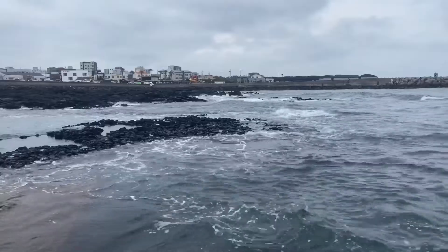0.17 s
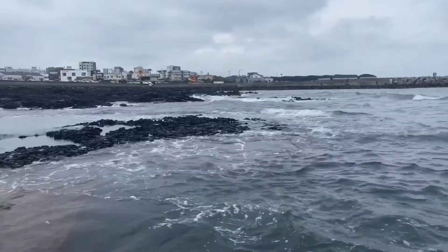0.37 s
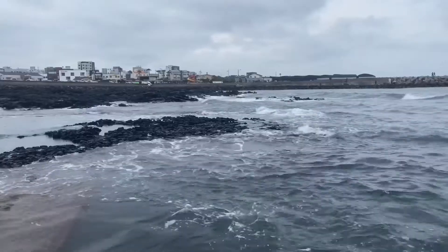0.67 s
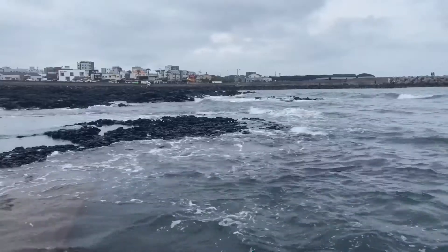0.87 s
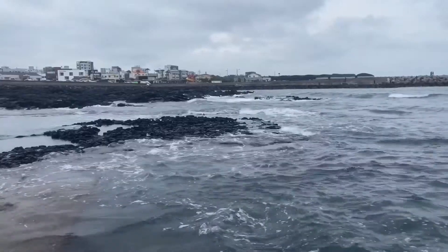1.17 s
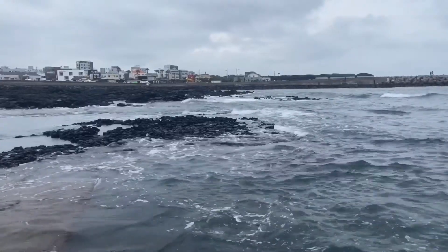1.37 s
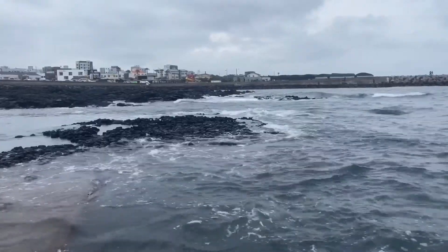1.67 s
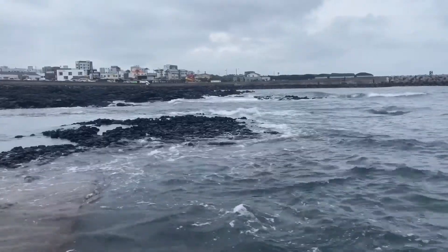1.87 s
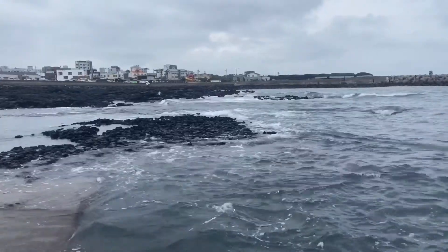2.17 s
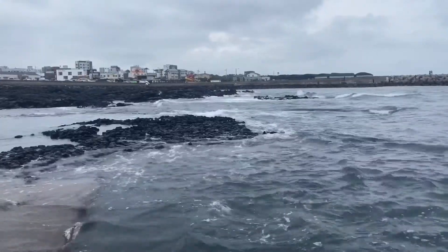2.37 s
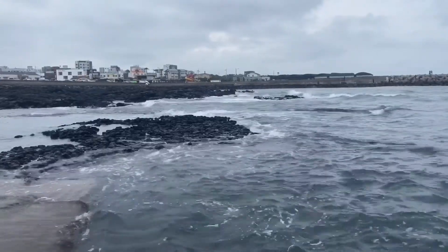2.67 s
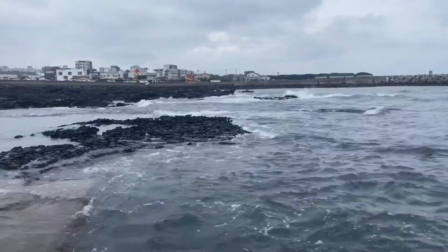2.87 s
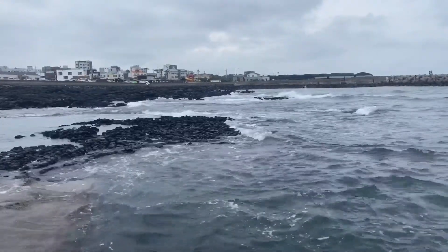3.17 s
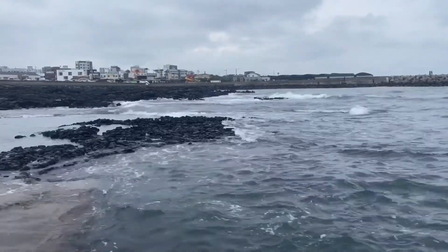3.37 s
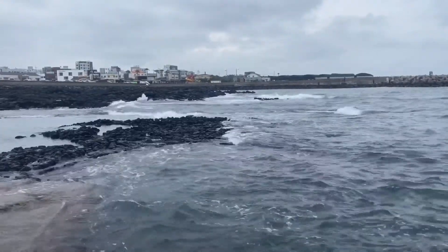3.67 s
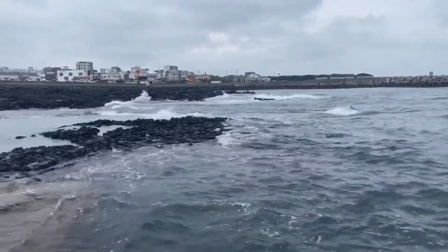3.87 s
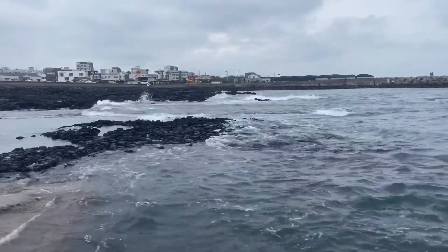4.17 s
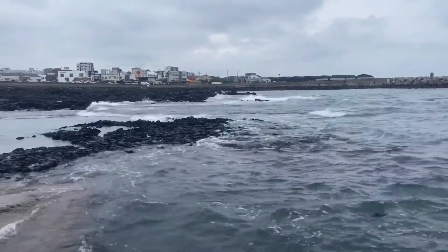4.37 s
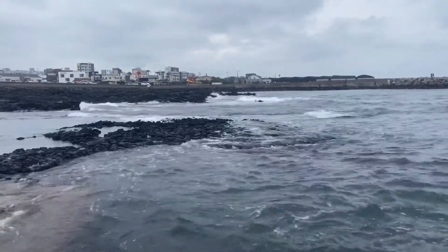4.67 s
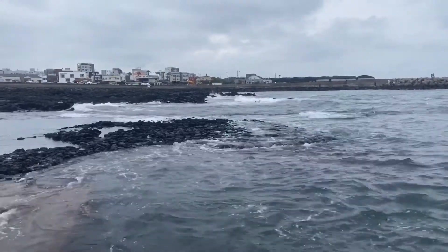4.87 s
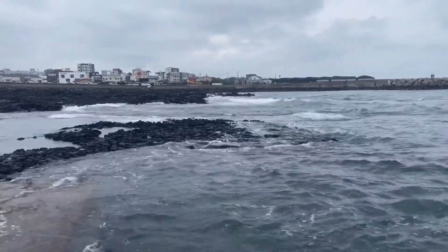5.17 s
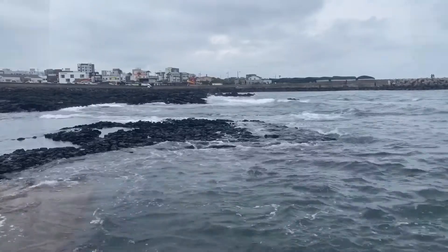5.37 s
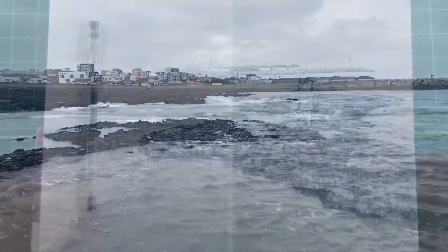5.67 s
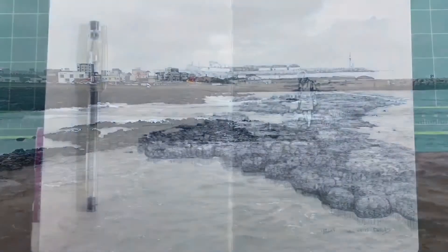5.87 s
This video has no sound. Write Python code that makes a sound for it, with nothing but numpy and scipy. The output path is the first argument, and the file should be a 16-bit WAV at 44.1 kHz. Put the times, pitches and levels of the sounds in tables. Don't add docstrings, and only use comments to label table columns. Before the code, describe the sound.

Small sea waves wash over low rocks outdoors, heard in stereo from close to the water. A continuous low roar of farther breakers lies under sloshing, lapping and fizzing foam. Gulps and drops come early, swell near one second, then thin out; more splashes follow after three seconds, and a sharp clap near five as everything fades.

```python
import sys
import numpy as np
from scipy import signal
from scipy.fft import rfft, irfft, next_fast_len
from scipy.io import wavfile
from scipy.ndimage import uniform_filter1d, map_coordinates

SR = 44100
rng = np.random.default_rng(int(sys.argv[2]) if len(sys.argv) > 2 else 0)


def linear_from_db(decibels):
    return 10 ** (np.asarray(decibels, float) / 20)


def master_out(mix):
    frames = np.transpose(np.atleast_2d(mix))
    ceiling = np.clip(frames, -1, 1)
    pcm = np.round(ceiling * 32767).astype(np.int16)
    wavfile.write(sys.argv[1], SR, pcm)


N = 264952

# frequency in Hz, level in dB.
RUMBLE_COLOUR = [(15, -40), (30, -21), (50, -2), (80, -1), (125, -2.5), (180, -14), (300, -54.5)]
# frequency in Hz, level in dB.
ROAR_COLOUR = [(60, -62), (120, -1.5), (190, 0), (350, 0.5), (560, -0.5), (800, -4.5), (1400, -37)]
# frequency in Hz, level in dB.
SLOSH_COLOUR = [(300, -43), (600, -2.5), (800, -3.5), (1000, 1.5), (1250, -5), (1550, -3.5), (1800, -13.5),
                (2300, -15), (4000, -59)]
# frequency in Hz, level in dB.
LAP_COLOUR = [(900, -15.5), (1600, 1), (2100, 3.5), (2700, -0.5), (3100, -10), (5000, -53)]
# frequency in Hz, level in dB.
FOAM_COLOUR = [(1600, -30), (2800, 2.5), (3300, 2.5), (4600, 0.5), (5600, -2.5), (7000, -7), (8500, -11),
               (12000, -35)]
# frequency in Hz, level in dB.
SPRAY_COLOUR = [(2500, -3), (4500, -15), (6000, -3.5), (8000, 3), (10000, -0.5), (12800, -2.5),
                (14300, -4.5), (16000, -8.5)]

# time in seconds, strength in dB.
BREAKERS = [(0.09, 0.5), (0.7, 0), (1.1, -2), (1.65, 1), (1.9, -1), (2.5, 2), (2.85, 1), (3.3, 3),
            (3.65, 0.5), (3.9, 3), (4.05, 0), (4.4, 3), (4.55, 0), (5.0, 1.5), (6.0, 2)]
# time in seconds, lift in dB, length in seconds, centre in
# Hz.
THUDS = [(0.14, 6.5, 0.023, 80), (0.185, 1, 0.011, 398), (0.7, 1, 0.027, 80), (1.03, 1, 0.064, 80),
         (1.24, 5, 0.036, 70), (1.57, 1, 0.094, 80), (2.03, 10, 0.056, 110), (2.18, 10, 0.022, 80),
         (2.275, 15, 0.017, 168), (2.61, 2, .05, 90), (2.78, 2.5, 0.045, 400), (3.1, 1, 0.067, 80),
         (3.47, 3, 0.059, 120), (3.76, 1, .04, 250), (3.94, 5, 0.085, 80), (4.09, 23, 0.045, 132),
         (4.17, 26, 0.014, 119), (4.25, 6, 0.034, 80), (4.45, -2, .04, 80), (4.68, 7, 0.039, 90),
         (4.86, 5, 0.01, 382), (4.97, 1, .05, 110), (5.24, 6, 0.15, 70), (5.62, 11, 0.061, 60),
         (2.15, -4.5, .2, 70), (3.3, 3, 0.17, 60), (4.4, -3, 0.11, 60), (0.9, 0, .08, 450),
         (1.3, -1, .12, 500), (3.46, -1, 0.11, 220), (4.7, -1.5, 0.067, 280), (2.05, 0, .15, 252),
         (5.69, 6, 0.041, 80)]
# time in seconds, strength in dB.
WASH = [(0.09, -1), (0.27, 1), (0.44, 3), (0.7, 1.5), (0.9, 2), (1.14, 6), (1.24, 3), (1.45, 1), (1.7, 0),
        (2.35, -1), (3.0, 0.5), (3.3, 1.5), (3.55, -0.5), (4.05, -1), (4.65, -1.5), (4.85, 1.5), (5.0, 0.5),
        (6.0, 1)]
# time in seconds, lift in dB, length in seconds, centre in Hz.
SLAPS = [(0.14, 7, .01, 1888), (0.19, 4, .03, 1000), (0.42, 6, .02, 2100), (0.4, 1, .3, 4277),
         (0.5, 4, .03, 3016), (1.01, 3.5, .025, 1099), (1.06, 3, .015, 1407), (1.11, 3.5, .03, 1000),
         (1.16, 2, .03, 4048), (1.405, 6, 0.012, 10200), (1.42, 5, .015, 1700), (2.43, 3.5, .03, 1315),
         (2.59, 2.5, .06, 4075), (2.84, 2, .05, 6970), (3.18, 4, .02, 2570), (3.25, 4.5, .02, 1410),
         (3.312, 8, .035, 2100), (3.385, 3, .02, 4500), (3.68, 2.5, .25, 5210), (3.9, 4, .07, 4820),
         (4.23, 2.5, .02, 6020), (4.76, 2.5, .03, 9000), (4.78, 4, .02, 1500), (4.82, 3, .02, 3000),
         (4.91, 5.5, .03, 9000), (4.925, 6.5, .025, 1592), (5.11, 2.5, .02, 9000), (5.17, 2.5, 0.018, 9000),
         (5.34, 3, .02, 7930), (0.12, 2.5, .2, 10970), (1.0, 1.5, .12, 3783), (1.3, 1, .1, 2794),
         (3.0, 1.5, .15, 2820), (3.8, 2.5, .3, 1696), (4.15, 1.5, .2, 2498), (4.85, 2, .15, 3510),
         (5.35, 1.5, .15, 1202), (5.75, 2.5, .25, 2100), (1.15, 2, .12, 2002), (2.95, 2, .12, 1504),
         (3.3, 2, .05, 3515), (3.45, 2.5, .12, 1103), (4.8, 2, .06, 1807), (4.91, 3, 0.039, 2000),
         (0.148, 4, .015, 2380), (3.29, 2, .06, 1996), (1.97, -1.5, .12, 1494), (5.32, 2.5, .4, 2890)]
# centre in Hz, level in dB in calm wash, dB gained per dB of wash.
NEAR_VOICES = [
    (1000, -31.5, 0.28),
    (2100, -37.5, 0.81),
    (4500, -38, 0.79),
    (9000, -46, 1.07),
]

# start in seconds, peak in dB, pitch in Hz, left over right in dB.
LOW_THUMPS = [(0.117, -20.5, 160.5, 3.5), (0.135, -22, 56, 2), (0.202, -20.5, 88, 2), (0.375, -28, 137, 2),
              (0.527, -22, 106, 5), (0.859, -28, 82, 2), (0.989, -26, 113, 2), (1.211, -17, 80, 2),
              (1.949, -26, 123, 2), (2.029, -26, 64.6, 0), (2.127, -36, 159, 2), (2.251, -17.5, 75.4, 0),
              (2.573, -22, 102, 0), (2.849, -20, 132, 2), (2.931, -21, 116, 0), (3.009, -20, 108, 1),
              (3.096, -20, 61.9, 2), (3.359, -25, 159, 2), (3.414, -17, 112.8, 2), (3.464, -20, 54.3, 2),
              (3.494, -15, 63.4, 2), (3.917, -27, 148, 2), (4.145, -21, 145, 4), (4.259, -23, 67.3, 2),
              (4.366, -23, 65.4, 2), (4.428, -23, 70.5, 2), (4.777, -21, 136, 2), (4.947, -17, 65.3, 2),
              (5.081, -19, 64, 2), (5.19, -17, 75.4, 2), (5.229, -20, 72.7, 2), (5.309, -15.5, 71, 3),
              (5.432, -26, 137.6, 2), (5.599, -30, 67, 2), (5.669, -27, 105, 2.5)]
# start in seconds, peak in dB, pitch in Hz, left over right in dB.
PATTER = [(0.794, -10, 2650, 0.0), (0.9382, -20, 2720, 1.0), (1.0594, -17, 2520, 0.0),
          (2.8239, -21, 4070, 2.5), (3.0274, -21, 3910, 2.0), (3.1092, -23, 3530, 0.0),
          (3.193, -22, 3355, 1.0), (3.283, -15, 2600, 1.5), (3.4909, -24, 2520, 0.5),
          (3.9114, -18, 4920, 2.5), (3.9558, -21, 2850, 1.5), (4.23, -19, 5170, 3.0),
          (4.8069, -23, 2850, 1.5), (4.9086, -14, 2870, 0.5), (5.4309, -28, 2620, 0.5)]
# start in seconds, peak in dB, pitch in Hz, left over right in dB.
CLAPS = [(0.1362, -8, 900, -4), (0.1372, -19, 2100, -3), (0.1385, -11, 1000, 0), (0.139, -22, 2250, -6),
         (0.1405, -25, 3000, -4), (3.3105, -27, 2600, 0), (3.321, -22, 2000, 0), (4.917, -3, 2220, -1),
         (4.9216, -7, 2350, -6), (4.9283, -6, 1700, -17), (4.928, -10, 2560, -3), (4.9324, -18, 1880, -10),
         (4.945, -16, 1590, 0)]
# start in seconds, peak in dB, pitch in Hz, left over right in dB.
GLUGS = [(0.135, -9, 886, -1.5), (0.179, -7.5, 700, -4.5), (0.19, -20, 477, -2), (1.001, -10, 940, -8),
         (1.007, -8.5, 1360, -3), (1.106, -4, 1060, -5.5), (1.119, -13, 1020, -4), (1.245, -14, 286, -1.5),
         (1.245, -11, 1000, -5), (2.263, -9.5, 200, 1), (2.279, -20, 193, -4), (2.43, -13.5, 267, -2.5),
         (2.779, -4.5, 646, 4), (3.114, -15, 306, -1), (3.175, -15, 230, -1), (3.43, -15.5, 191, -1),
         (3.47, -16, 243, -1), (4.7, -18.5, 275, 0), (0.885, -13, 454, -1), (1.057, -12, 1040, -2),
         (1.18, -13, 1100, -2), (1.36, -14, 1650, -2), (3.112, -5.5, 637, -3), (3.648, -24, 230, -0.5),
         (4.164, -10.5, 509, 4), (4.774, -14, 1060, 4), (4.856, -6, 420, 6), (4.871, -13, 298, -1),
         (4.889, -11, 550, 6), (4.93, -7, 1106, 3), (4.976, -9, 415, 10)]
# start in seconds, peak in dB, pitch in Hz, left over right in dB.
DROPS = [(0.1376, -26, 3090, -9), (0.1366, -5.5, 2170, -3), (0.147, -15, 2440, -2),
         (0.178, -27, 2000, -2.5), (0.9383, -12, 2680, -0.5), (1.061, -12.5, 2660, -1.5),
         (1.1994, -5, 2250, 0), (1.265, -10.5, 2000, -0.5), (1.4232, -11.5, 2580, -4),
         (3.107, -13.5, 3360, 0), (3.1807, -11.5, 2010, -1), (3.1944, -10, 3280, 5), (3.2535, -7, 1765, -4),
         (3.2816, -18, 2540, 0), (3.3029, -23, 2510, 1), (3.3144, -19, 2290, -2), (3.324, -14, 1910, 0),
         (3.3464, -16, 1710, -1.0), (3.4914, -15, 2540, -0.5), (4.7147, -11, 2020, -1.0),
         (4.9104, -10, 2140, 0.5), (4.9274, -13, 2280, -1.0), (4.919, -22, 2450, 0), (4.932, -14, 1400, 0),
         (4.942, -27, 1710, -0.5)]
# start in seconds, peak in dB, pitch in Hz, left over right in dB.
TICKS = [(1.9394, -40, 4900, -2), (2.4294, -16, 7700, 0), (3.3114, -21, 5220, 8), (3.3293, -18, 6010, 1.0),
         (3.3844, -22, 6290, 1.5), (3.681, -26, 5900, 1.0), (3.681, -23, 10200, 0), (3.8894, -18, 5240, 4),
         (3.9115, -18, 5230, 5), (3.9555, -17, 5870, 3), (4.2315, -18.5, 6030, 6), (4.7653, -22.5, 5060, 4),
         (4.807, -14, 6330, 1.0), (4.8818, -21, 4930, 0.5), (4.9114, -23, 5270, 1.5),
         (5.1744, -21, 9540, 1.0)]

# frequency in Hz, likeness from 0 to 1, phase lead of right in radians.
PORTS = [(60, .58, .1), (200, .8, .28), (500, .5, 1.1), (1000, .36, 1.6), (1750, .05, 0), (2600, .46, -.7),
         (5000, .32, -.6), (5700, .08, 0), (6700, .42, .1), (7400, .3, 1.9), (7950, .6, 2.85),
         (8400, .8, 3.14), (8800, .76, 3.4), (9400, .42, 4.5), (10200, .85, 5.9), (11050, .96, 6.2),
         (11900, .8, 7.4), (12800, .96, 8.95), (14000, .96, 9.95), (15500, .95, 12.4)]
# frequency in Hz, left over right in dB.
LEAN = [(200, -0.5), (900, -1.5), (2100, -1), (3300, 0.3), (5400, 3), (7400, 0), (12000, -0.5)]
# centre in Hz, half width in Hz, depth in dB.
CASE_DIP = (5500, 180, -1.2)


def unit(x):
    return x / np.sqrt(np.mean(x ** 2) + 1e-20)


def along(points, hz):
    f, value = np.transpose(points)
    return np.interp(np.log(hz + 1), np.log(f + 1), value)


def strength_curve(rows):
    s, db = np.transpose(rows)
    return np.interp(np.arange(N) / SR, s, db)


def filtered(x, response):
    size = next_fast_len(N + 8192)
    hz = np.fft.rfftfreq(size, 1 / SR)
    return irfft(rfft(x, size) * response(hz), size)[..., :N]


def wobble(rate):
    knots = rng.standard_normal(400)
    return map_coordinates(knots, [np.arange(N) * np.clip(rate, .1, 60) / SR])


def lifts(events, voice_hz, reach_octaves):
    t = np.arange(0, N, 64) / SR
    total = 0
    for s, db, fall, hz in events:
        near = np.exp(-(np.log2(hz / voice_hz) / reach_octaves) ** 2)
        length = np.where(t < s, 0.4 * fall, fall)
        total = total + db * near * np.exp(-((t - s) / length) ** 2)
    return np.interp(np.arange(N) / SR, t, total)


def smeared_noise(shape, bins, frames):
    tall = uniform_filter1d(rng.standard_normal(shape), size=bins, axis=0)
    return unit(uniform_filter1d(tall, size=frames, axis=1))


def rush(colour, patchy_db, surge_db, streak_db=2.5):
    z = signal.stft(rng.standard_normal((2, N)), nperseg=1024)[2]
    patches = smeared_noise(z.shape[1:], bins=14, frames=5)
    streaks = smeared_noise(z.shape[1:], bins=2, frames=3)
    gain = linear_from_db(patchy_db * patches + streak_db * streaks)
    pair = signal.istft(z * gain, nperseg=1024)[1][:, :N]
    coloured = filtered(pair, lambda hz: linear_from_db(along(colour, hz)))
    return unit(coloured * linear_from_db(surge_db))


def bubbles(s, db, hz, pan_db, cycles, rise, size):
    t = np.arange(size) / SR
    age = t * hz[:, None] / cycles
    ring = np.sin(2 * np.pi * hz[:, None] * t * (1 + rise * age / 2))
    ring *= np.exp(-age) * (1 - np.exp(-6 * age))
    ring *= np.hanning(2 * size)[size:] ** .5
    at = (np.round(s * SR).astype(int)[:, None] + np.arange(size)).ravel()
    turn = np.tanh(pan_db / 9)
    share = [linear_from_db(db) * np.cos(turn), linear_from_db(db) * np.sin(turn)]
    return np.array([np.bincount(at, (ring * g[:, None]).ravel(), N + size)[:N] for g in share])


def swarm(level_db, count, centre_hz, octaves, spread_db, cycles, size):
    draw = rng.random((count, 2))
    normal = rng.standard_normal((count, 2))
    crowd = np.cumsum(linear_from_db(1.6 * (level_db - uniform_filter1d(level_db, size=SR))))
    s = np.interp(draw[:, 0], crowd / crowd[-1], np.arange(N) / SR)
    hz = np.clip(centre_hz * 2 ** (octaves * normal[:, 0]), 100, 15000)
    db = -spread_db * np.log(draw[:, 1] + 0.00093)
    db = db - 10 * np.log10(cycles * centre_hz / hz)
    return unit(bubbles(s, db, hz, 8 * normal[:, 1], cycles, rise=0.143, size=size))


def cluster(events, spread_s, octaves):
    s, db, hz, pan_db = np.repeat(events, 4, axis=0).T
    scatter = rng.standard_normal((len(s), 3))
    s = s + spread_s * abs(scatter[:, 0])
    db = db + scatter[:, 1]
    hz = hz * 2 ** (octaves * scatter[:, 2])
    return bubbles(s, db, hz, pan_db, cycles=3.1, rise=0.018, size=800)


def swell():
    strength_db = strength_curve(BREAKERS)
    rumble_db = -35 + 0.29 * strength_db + lifts(THUDS, 80, reach_octaves=0.83)
    roar_db = -27.5 + strength_db + lifts(THUDS, 334, reach_octaves=0.83)
    rumble = rush(RUMBLE_COLOUR, patchy_db=-0.2, surge_db=0.3 * wobble(4.4), streak_db=0.2)
    roar = rush(ROAR_COLOUR, patchy_db=-0.96, surge_db=0.14 * wobble(9.0), streak_db=1.5)
    return linear_from_db(rumble_db + 1.5) * rumble + linear_from_db(roar_db + 2.16) * roar


def surf():
    wash_db = strength_curve(WASH)
    slosh_db, lap_db, foam_db, spray_db = [
        db + grows * wash_db + lifts(SLAPS, hz, reach_octaves=1.05) for hz, db, grows in NEAR_VOICES]
    surge = 0.073 * wobble(7.8) + 0.23 * wobble(21.88)

    slosh = rush(SLOSH_COLOUR, patchy_db=1.1, surge_db=0.87 * surge)
    slosh += linear_from_db(-10.0) * swarm(slosh_db, count=1200, centre_hz=1107, octaves=0.361,
                                spread_db=0.5, cycles=6.4, size=1200)
    lap = rush(LAP_COLOUR, patchy_db=0.16, surge_db=1.8 * surge)
    lap += linear_from_db(-31) * swarm(lap_db, count=1500, centre_hz=2280, octaves=0.317,
                            spread_db=7.0, cycles=8.8, size=700)
    foam = rush(FOAM_COLOUR, patchy_db=-0.26, surge_db=2.0 * surge)
    foam += 0.14 * swarm(foam_db, count=4000, centre_hz=4490, octaves=0.33,
                         spread_db=6.5, cycles=5.9, size=350)
    spray = rush(SPRAY_COLOUR, patchy_db=1.5, surge_db=0.24 * surge)
    spray += 0.22 * swarm(spray_db, count=3000, centre_hz=9660, octaves=0.365,
                          spread_db=2.0, cycles=4.2, size=150)

    body = linear_from_db(slosh_db + 2.0) * slosh + linear_from_db(lap_db + 1.5) * lap
    fizz = linear_from_db(foam_db + 1.5) * foam + linear_from_db(spray_db + 6.5) * spray
    return body + fizz


def splashes():
    low_thumps = bubbles(*np.transpose(LOW_THUMPS), cycles=3.5, rise=0.085, size=5000)
    patter = bubbles(*np.transpose(PATTER), cycles=3.1, rise=0.1, size=300)
    claps = bubbles(*np.transpose(CLAPS), cycles=1.15, rise=0.05, size=400)
    glugs = bubbles(*np.transpose(GLUGS), cycles=7.9, rise=0.022, size=3000)
    drops = cluster(DROPS, spread_s=0.001225, octaves=0.044)
    ticks = cluster(TICKS, spread_s=0.00089, octaves=0.13)
    water = linear_from_db(-1.0) * low_thumps + linear_from_db(-5.0) * glugs + 1.15 * claps
    return water + linear_from_db(-7.0) * patter + linear_from_db(-8.5) * drops + linear_from_db(-1.0) * ticks


def scene():
    return swell() + surf() + splashes()


def roll_off(x):
    return signal.sosfilt(signal.butter(12, 15830, fs=SR, output="sos"), x)


def record(dry):
    port_hz, alike, lead = np.transpose(PORTS)
    start_s, fade_from_s, fade_to_s, top_hz = 0.0731, 4.735, 6.145, 15790

    def blend(hz):
        turn = np.arccos(np.clip(np.interp(hz, port_hz, alike), 0, 1)) / 2
        return np.array([np.cos(turn), np.sin(turn)])

    def ports(hz):
        half = linear_from_db(along(LEAN, hz) / 2) * np.exp(-.5j * np.interp(hz, port_hz, lead))
        return np.array([half, 1 / half]) * (hz < top_hz)

    mid, side = filtered(dry, blend)
    pair = filtered(np.array([mid + side, mid - side]), ports)
    dip_hz, width_hz, dip_db = CASE_DIP
    pair = filtered(pair, lambda hz: linear_from_db(dip_db * np.exp(-((hz - dip_hz) / width_hz) ** 4)))

    t = np.arange(N) / SR - start_s
    opening = (t > 0) * np.clip(0.52 + t / 0.061, 0, 1)
    closing = np.clip((fade_to_s - start_s - t) / (fade_to_s - fade_from_s), 0, 1)
    return roll_off(pair * opening * closing)


dry = scene()
out = record(dry)
master_out(out)
```